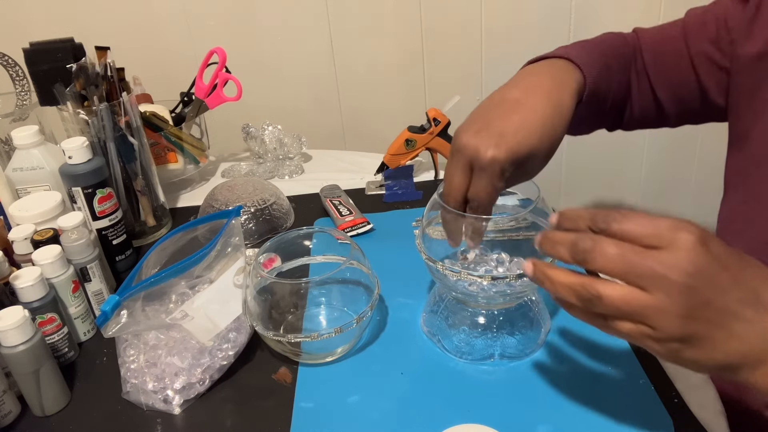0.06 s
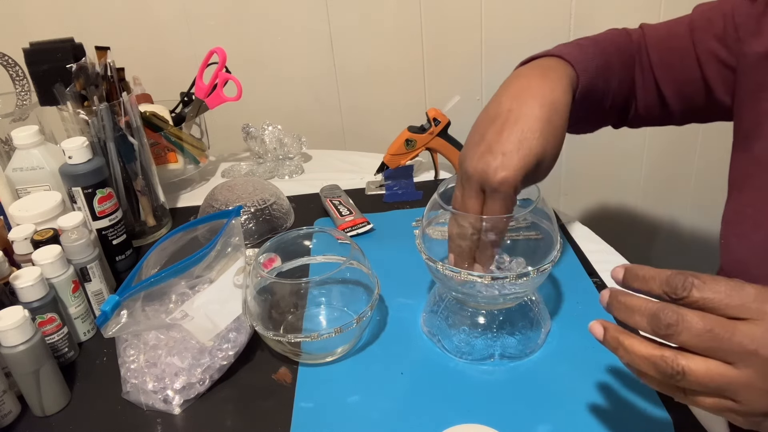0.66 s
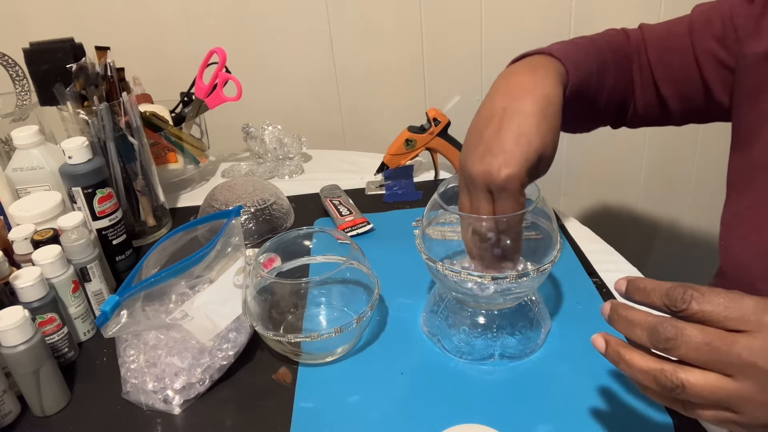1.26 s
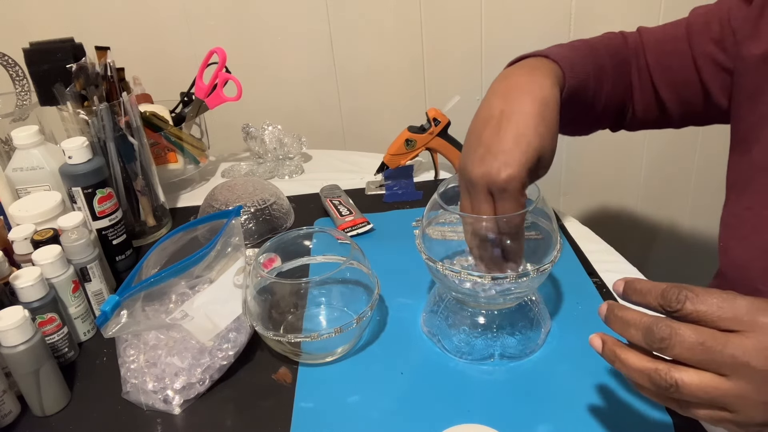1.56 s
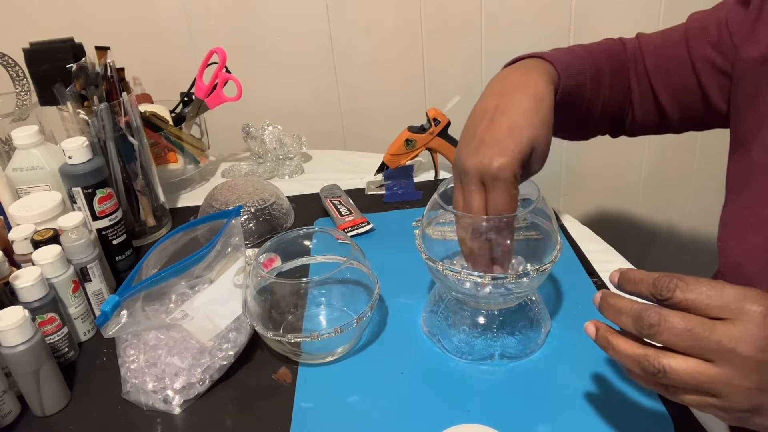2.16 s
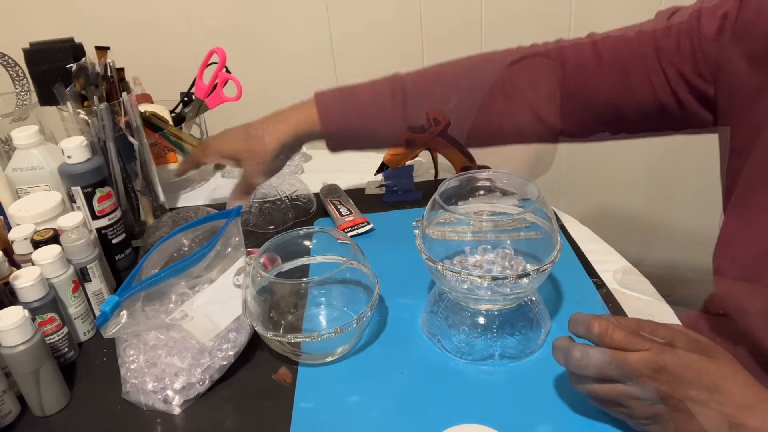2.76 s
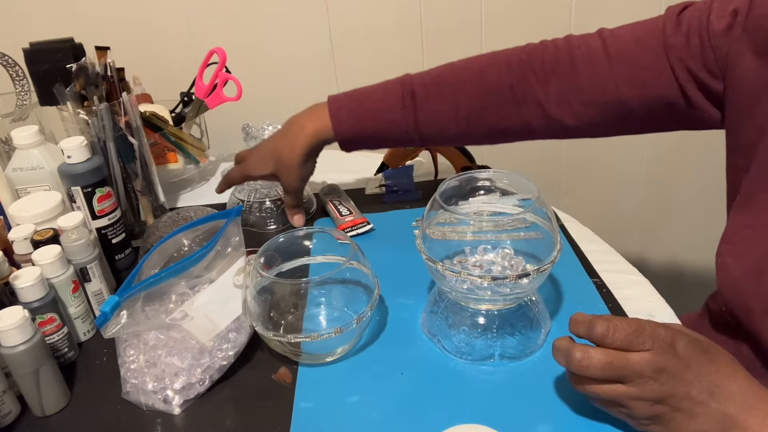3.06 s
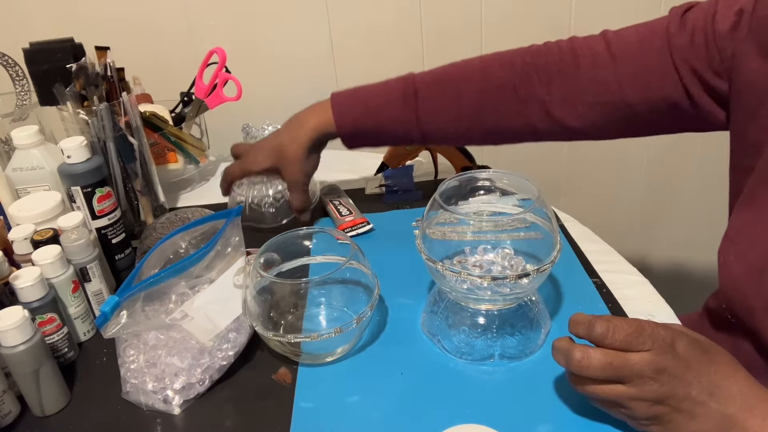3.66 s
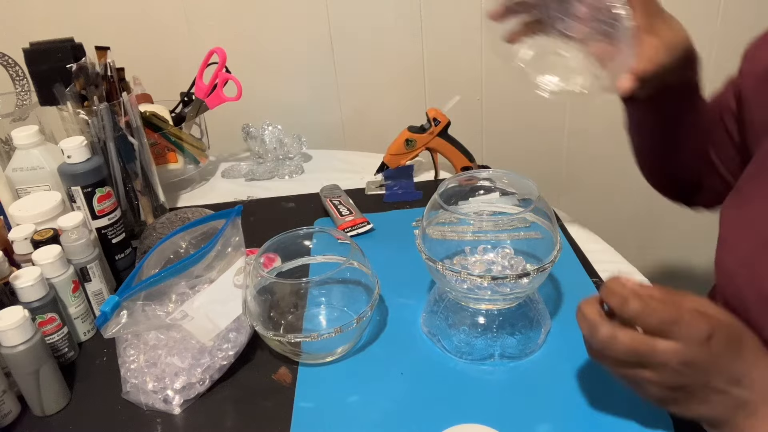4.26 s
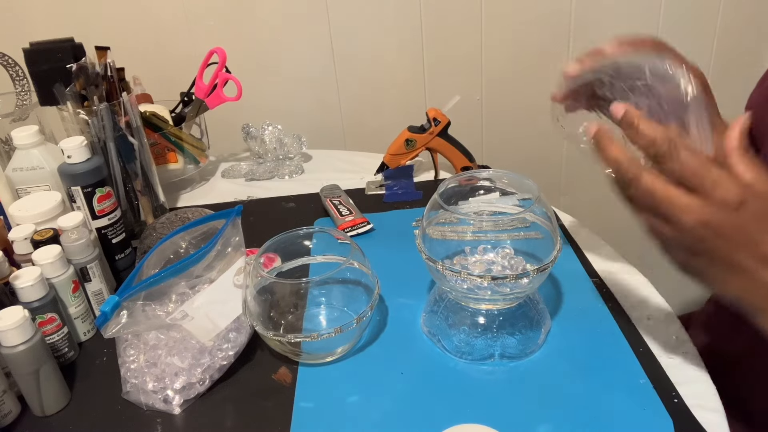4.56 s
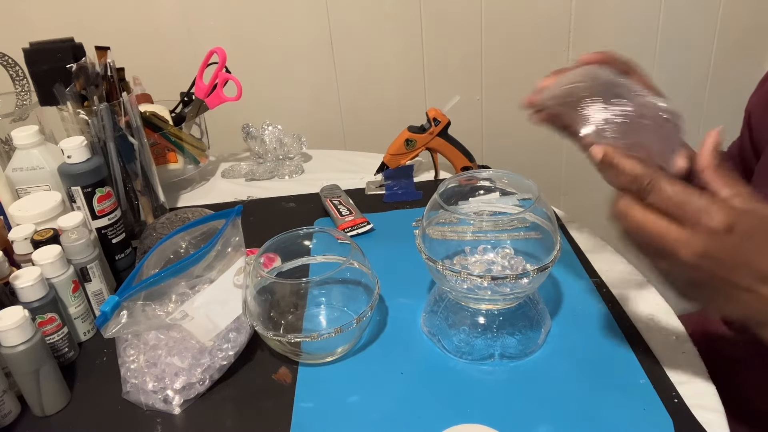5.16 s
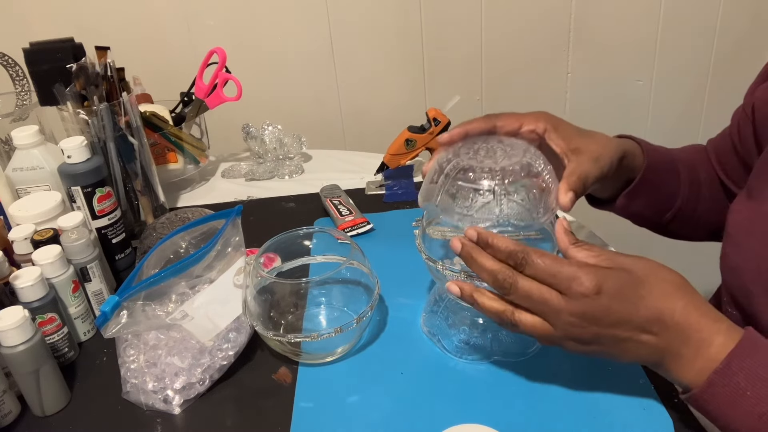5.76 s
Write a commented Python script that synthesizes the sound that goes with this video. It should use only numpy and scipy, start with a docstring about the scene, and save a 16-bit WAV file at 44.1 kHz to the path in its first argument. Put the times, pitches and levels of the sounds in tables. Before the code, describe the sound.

Plastic gems tumble into a ringing glass bowl and get nudged about; another bowl clinks, followed by light finger taps in a quiet room.

```python
"""A handful of plastic gems tumbles into a glass bowl on a craft table; fingertips nudge the pile flat.
Every contact is a bright tick that knocks the bowl and sets its rim and wall ringing. Off to the side,
a second glass bowl is picked up with a clink, its rim singing as it slides off the table, and is turned
over in the hands, which tap and rub on it. Underneath lie a dull table rumble and the air and faint
mains hum of a small room, all heard from a phone standing close by."""
import sys
import numpy as np
from scipy import signal
from scipy.fft import rfft, irfft, next_fast_len
from scipy.io import wavfile

SR = 44100
rng = np.random.default_rng(int(sys.argv[2]) if len(sys.argv) > 2 else 0)


def int16_out(signal):
    """Quantize to a 16-bit WAV file."""
    q = np.round(np.clip(np.atleast_2d(signal).T, -1, 1) * 32767)
    wavfile.write(sys.argv[1], SR, q.astype(np.int16))


N = 260835
TIME = np.arange(N) / SR

# gem hits, the tumble and then the nudges: (time [s], tick [dB], chime [dB], extra push on the bowl [dB])
GEM_HITS = [(0.1684, -30, -30.5, -5), (0.1824, -22, -40, -2), (0.1873, -33, -26.5, 0),
            (0.222, -32.5, -37.5, 0), (0.2376, -40, -58, -8), (0.253, -35.5, -52, -2),
            (0.26, -27, -50, -2.5), (0.2931, -33.5, -33, -0.5), (0.3085, -28.5, -35, -5),
            (0.3183, -33, -32.5, -9.5), (0.325, -41, -42, 1), (0.336, -33, -55, 0),
            (0.375, -30.5, -31.5, -2.5), (0.4191, -38, -40, -2.5), (0.4389, -38.5, -41.5, -7),
            (0.521, -35, -43.5, 2), (0.547, -45, -47, 1), (0.5663, -49, -66, 2), (0.8455, -66, -56.5, 5),
            (0.8615, -55, -48.5, 0), (0.868, -47, -40.5, -4), (0.874, -43, -64, -2), (0.908, -58, -71, 7),
            (0.929, -59, -52.5, 2.5), (0.9938, -50, -51.5, -1), (1.0276, -40, -43, 3.5),
            (1.0411, -42, -64, 1), (1.0756, -54, -68, 4.5), (1.0985, -48.5, -64, -0.5),
            (1.1176, -55.5, -72, -18), (1.2439, -76, -57.5, 6.5), (1.2719, -61.5, -73, -0.5),
            (1.297, -44, -43.5, -0.5), (1.6142, -47, -57.5, -13), (1.6495, -43.5, -44.5, 3.5),
            (1.6694, -47, -55, 2.5), (1.6923, -59, -73, -3), (1.879, -85, -86, 8),
            (1.935, -56.5, -62, -1.5), (2.2167, -53, -51.5, -1), (2.2357, -45, -50, -3.5),
            (2.2439, -39.5, -62, -2), (2.2595, -43, -46, -23), (2.264, -42, -52, 1),
            (2.277, -48.5, -62, 0.5), (2.2909, -45, -63, -2), (2.7112, -63, -65.5, -4.5),
            (2.801, -74, -67, -5.5)]
# bright tick of gem on gem and glass: (frequency [Hz], relative level [dB])
TICK_COLOUR = [(300, -46.5), (700, -10.5), (3800, -17.5), (5200, -15.5), (6200, -6.5), (7800, -7),
               (8500, -9), (9450, 6.5), (10200, -10.5), (11000, -12.5), (11800, -0.5), (12900, -13),
               (14200, -10), (15500, -16.5)]
# knock of the bowl, damped by pile and hand: (frequency [Hz], width [Hz], relative level [dB])
KNOCK_MODES = [(231, 120, -15.5), (528, 100, -2.5), (613, 108, 2.5), (814, 100, -1), (974, 220, -5),
               (1335, 71.7, -6), (1635, 160, 0.5), (1874, 8, -4.5), (3100, 247, -17), (3660, 97, -11),
               (4040, 390, -11), (5220, 111, -4.5)]
# clink of the rim, a close pair of modes: (frequency [Hz], width [Hz], relative level [dB])
CLINK_MODES = [(2513, 60, 0), (2570, 220, -10)]
# high chime of the wall: (frequency [Hz], width [Hz], relative level [dB])
CHIME_MODES = [(6774, 24, -14), (7003, 14, -5), (7138, 12, -1), (7200, 24, -6), (7338, 20, -10),
               (7170, 340, -7), (7828, 20, -15), (8080, 20, -14), (8420, 16, -16), (8820, 20, -15),
               (9430, 24, -13), (11762, 14, -19)]


def gems(medium_blow_db=-38.5):
    """Every contact ticks, knocks the bowl and sets its rim and wall ringing."""
    times, tick_db, chime_db, push_db = topple(GEM_HITS)
    blow_db = 10 * np.log10(from_db(tick_db) ** 2 + from_db(chime_db) ** 2) - medium_blow_db
    # the bowl's low modes swing less from blow to blow than the tick does
    knock_db = -51.5 + 0.52 * blow_db + push_db
    clink_db = -58.5 + 0.6 * blow_db + push_db
    # a falling gem lands in one clean crack; a nudged one chatters against its neighbours
    loose_db = np.minimum(0.6 * (tick_db.max() - tick_db), 10)
    cracks = [contact(chatter_s=0.003, chatter_db=db - 6, settle_s=0.02, settle_db=db - 12)
              for db in loose_db]
    # the pile passes the blow on to the glass over a few ms
    pushes = [contact(chatter_s=0.01, chatter_db=2, settle_s=0.0096, settle_db=-4) for _ in times]
    tick, count = colour(TICK_COLOUR), len(times)
    ticks = strike(times, tick_db, cracks, [gem_tick(tick) for _ in times], attack_s=0.0054, held_s=0.0045)
    knocks = strike(times, knock_db, pushes, spots(KNOCK_MODES, count), attack_s=0.0038, held_s=0.025)
    clinks = strike(times, clink_db, pushes, [body(CLINK_MODES)] * count, attack_s=0.0086, held_s=0.017)
    chimes = strike(times, chime_db, pushes, spots(CHIME_MODES, count), attack_s=0.0049, held_s=0.05)
    return ticks + knocks + clinks + chimes


def topple(hits, neighbours=2, after_s=0.022):
    """Each hit unsettles neighbours that land softly just after it; returns the columns of all contacts."""
    times, tick_db, chime_db, push_db = np.repeat(hits, neighbours, axis=0).T
    wait, luck = rng.standard_normal((len(times), 2)).T
    weaker_db = -14.5 + 2.5 * luck
    toppled = [times + after_s * np.abs(wait), tick_db + weaker_db, chime_db + weaker_db, push_db - 2]
    return np.hstack([np.transpose(hits), toppled])


def gem_tick(tick, ring_db=-2, width_hz=200, size=1024):
    """Each gem adds six short, glittering resonances of its own to the common tick."""
    modes = [(hz, width_hz, 0) for hz in rng.uniform(6000, 16000, 6)]
    ring = from_db(ring_db) * body(modes, size)
    ring[0] += 1   # lets the plain tick through
    return signal.fftconvolve(ring, tick[:size])


def spots(modes, count, spread_db=3.5):
    """One response per blow: each spot of the bowl favours other modes."""
    shapes = np.array([(-1) ** k * from_db(db) * np.sqrt(width) * body([(hz, width, 0)])
                       for k, (hz, width, db) in enumerate(modes)])
    return from_db(spread_db * rng.standard_normal((count, len(modes)))) @ shapes


# bumps of the second bowl: (time [s], strength [dB], note of the touched spot [Hz])
PICK_UP_BUMPS = [(3.153, -68, 1490), (3.282, -43.5, 3040), (3.293, -69, 4830), (3.3892, -53.5, 2200),
                 (3.4278, -51.5, 1590), (3.436, -52, 710), (3.4516, -54.5, 600), (3.462, -55, 4840)]
# its ring in the hand: (frequency [Hz], width [Hz], relative level [dB])
HELD_MODES = [(462, 120, 0), (658, 103, -1), (740, 130, -2), (1214, 56, -1.5), (1540, 120, -3),
              (2250, 175, 2), (2510, 114, -0.5), (2822, 61, 3.5), (3476, 170, -1.5), (4260, 200, -4),
              (4710, 61, 1), (6370, 1030, -8)]


def pick_up():
    """The second bowl is lifted: one hard clink among duller bumps."""
    return touch_bowl(PICK_UP_BUMPS, HELD_MODES,
                      tick_db=1.5, body_db=0.5, note_db=-3, note_width_hz=150, dulling=1.8)


# light taps on its wall: (time [s], strength [dB], note of the touched spot [Hz])
FINGER_TAPS = [(4.6055, -56.5, 4080), (4.6375, -56, 4350), (4.677, -51, 3320), (4.8046, -55, 4170),
               (4.914, -57, 3800), (5.029, -61, 1250), (5.059, -60, 4360), (5.1366, -58.5, 4500)]
# wall modes under a tapping or rubbing fingertip: (frequency [Hz], width [Hz], relative level [dB])
FINGERTIP_MODES = [(378, 50, 2), (640, 17.6, 7), (1135, 73, -1.5), (1434, 200, -3), (2590, 94, -16),
                   (3876, 160, -2.5), (4670, 170, 0)]


def finger_taps():
    """Fingers land on the glass as the bowl turns, each with a short, damped note."""
    return touch_bowl(FINGER_TAPS, FINGERTIP_MODES,
                      tick_db=-2.5, body_db=-6.5, note_db=2, note_width_hz=430, dulling=0.27)


# glassy edge of a tap on the rim: (frequency [Hz], relative level [dB])
RIM_TICK_COLOUR = [(1500, -83), (4000, -11), (6500, -2), (8000, -2.5), (8830, 5.5), (9300, 4),
                   (10800, -7.5), (11400, 1), (13000, -2.5), (15500, -30)]


def touch_bowl(touches, modes, tick_db, body_db, note_db, note_width_hz, dulling):
    """Each touch ticks, rings the held bowl and sounds its spot's note; softer ones lose their tick."""
    times, db, note_hz = np.transpose(touches)
    forces = [contact(chatter_s=0.0024, chatter_db=10, settle_s=0.0062, settle_db=3) for _ in times]
    dulled_db = db + tick_db - dulling * (db.max() - db)
    rim_ticks = [colour(RIM_TICK_COLOUR)] * len(times)
    spot_rings = [body([(hz, note_width_hz, 0)]) for hz in note_hz]
    ticks = strike(times, dulled_db, forces, rim_ticks, attack_s=0.0043, held_s=0.0043)
    knocks = strike(times, db + body_db, forces, [body(modes)] * len(times), attack_s=0.0064, held_s=0.025)
    notes = strike(times, db + note_db, forces, spot_rings, attack_s=0.0024, held_s=0.025)
    return ticks + knocks + notes


# swell and fade of the sliding rim: (time [s], level [dB])
SLIDE_ENVELOPE = [(3.28, -110), (3.3, -63), (3.335, -56.5), (3.37, -65), (3.42, -72), (3.47, -68),
                  (3.6, -105)]
# its singing modes: (frequency [Hz], width [Hz], relative level [dB])
SINGING_MODES = [(2277, 25, 0), (2340, 60, -9), (2840, 120, -12), (3375, 30, 1), (3480, 110, -8),
                 (4786, 200, -13)]


def rim_slide():
    """Grainy friction makes the second bowl's rim sing as it slides off the table."""
    return gain_curve(SLIDE_ENVELOPE) * through(grains(N, spread_db=3.7), body(SINGING_MODES))


# strokes of skin on glass: (start [s], length [s], relative level [dB])
SKIN_STROKES = [(3.261, 0.035, -62.5), (3.421, 0.038, -67.5), (4.211, 0.02, -71.5), (4.287, 0.15, -77.5),
                (4.606, 0.12, -75), (4.759, 0.18, -65), (4.994, .14, -65.5), (5.036, 0.021, -64.5),
                (5.187, .025, -69.5)]
# hiss of the rubbing skin: (frequency [Hz], relative level [dB])
SKIN_COLOUR = [(200, -18), (640, -22), (950, -12.5), (1300, -16), (2000, -20.5), (2500, -12), (2850, -19),
               (3300, -18), (4500, -13), (5700, -8.5), (8500, -11.5), (12000, -14.5), (15500, -22)]


def rubbing(slips_per_s=120, grips_per_s=45, grip_db=2, attack_s=0.026, release_s=0.014):
    """Skin on glass grips and lets go: an uneven hiss with tiny separate slips that ring the wall."""
    slip_here = rng.random(N) < slips_per_s / SR
    slips = unit_energy(slip_here * rng.standard_normal(N)) * np.sqrt(N)
    grip = np.interp(TIME * grips_per_s, np.arange(N), rng.standard_normal(N))
    pressure = np.zeros(N)
    for start, length, db in SKIN_STROKES:
        swell = np.exp(np.minimum(TIME - start, 0) / attack_s)
        release = np.exp(-np.maximum(TIME - start - length, 0) / release_s)
        pressure += from_db(db) * swell * release
    friction = (rng.standard_normal(N) + slips) * pressure * from_db(grip_db * grip)
    hiss = from_db(-5.5) * through(friction, colour(SKIN_COLOUR))
    ring = from_db(-6.5) * through(friction, body(FINGERTIP_MODES))
    return hiss + ring


def contact(chatter_s, chatter_db, settle_s, settle_db, size=4096):
    """Force of one contact: a click, a few ms of chatter, then a sparser crackle of settling."""
    t = TIME[:size]
    force = from_db(chatter_db) * unit_energy(grains(size, spread_db=5.1) * np.exp(-t / chatter_s))
    force += from_db(settle_db) * unit_energy(grains(size, spread_db=12) * np.exp(-t / settle_s))
    force[0] += 1
    return force


def grains(size, spread_db):
    """Random micro-impacts of very uneven strength, rms 1."""
    impacts = rng.standard_normal(size) * from_db(spread_db * np.clip(rng.standard_normal(size), -2, 2))
    return unit_energy(impacts) * np.sqrt(size)


def strike(times, levels_db, forces, responses, attack_s, held_s):
    """Each force rings its response; the level is the energy of the first held_s spread over attack_s."""
    out = np.zeros(N)
    for time, db, force, response in zip(times, levels_db, forces, responses):
        hit = signal.fftconvolve(force, response)
        early_energy = np.sum(hit[:int(held_s * SR)] ** 2)
        hit *= from_db(db) * np.sqrt(attack_s * SR / early_energy)
        start = int(time * SR)
        out[start:start + len(hit)] += hit[:N - start]
    return out


def body(modes, size=6000):
    """Ring of a struck object: decaying sines, the narrower the longer."""
    t = TIME[:size]
    ring = np.zeros(size)
    for k, (hz, width, db) in enumerate(modes):
        envelope = from_db(db) * width * np.exp(-np.pi * width * t)
        ring += (-1) ** k * envelope * np.sin(2 * np.pi * hz * t)
    return unit_energy(ring)


def colour(points, size=8192):
    """An EQ curve as a causal (minimum-phase) impulse response."""
    hz, db = np.transpose(points)
    grid_hz = np.maximum(np.arange(size // 2 + 1) * SR / size, 1)
    gain = from_db(np.interp(np.log(grid_hz), np.log(hz), db))
    cepstrum = irfft(np.log(gain))
    cepstrum[1:size // 2] *= 2
    cepstrum[size // 2 + 1:] = 0
    return unit_energy(irfft(np.exp(rfft(cepstrum))))


def through(x, response):
    """A signal passed through an impulse response."""
    return signal.oaconvolve(x, response)[:N]


def gain_curve(rows):
    """A (time [s], level [dB]) envelope as a gain at every sample."""
    return from_db(np.interp(TIME, *np.transpose(rows)))


def from_db(db):
    """Decibels to gain."""
    return 10 ** (np.asarray(db) / 20)


def unit_energy(x):
    """Scaled so that its squares sum to one."""
    return x / np.sqrt(np.sum(x ** 2) + 1e-20)


# the small room's reverb bands: (low edge [Hz], high edge [Hz], t60 [s], relative level [dB])
REVERB_BANDS = [(203, 920, 0.53, 1.5), (1110, 4930, 0.3, 0.5), (3616, 8740, 0.19, -7),
                (8300, 17000, 0.41, -13)]


def room_tail(build_s=0.0015, size=24000):
    """Dense reflections that build up quickly and linger longest in the lows."""
    t, tail = TIME[:size], 0
    for low, high, t60, db in REVERB_BANDS:
        envelope = from_db(-60 * t / t60) * (1 - np.exp(-t / build_s))
        reflections = unit_energy(rng.standard_normal(size) * envelope)
        band = signal.butter(2, [low, high], "band", fs=SR, output="sos")
        tail = tail + from_db(db) * signal.sosfilt(band, reflections)
    return tail


def in_room(dry, wet_db, side_db, left_late_s=0):
    """Direct sound, which may reach the left channel later, plus the room's answer in each channel."""
    direct = np.array([np.roll(dry, round(left_late_s * SR)), dry])
    reverb = np.array([through(dry, tail) for tail in diffuse(room_tail, side_db)])
    return direct + from_db(wet_db) * reverb


def diffuse(make, side_db):
    """A wide stereo field: one part common to both channels and one opposed."""
    side = from_db(side_db)
    return (make() + side * make() * np.array([[1], [-1]])) / np.sqrt(1 + side ** 2)


# rise and fall of the table's rumble: (time [s], relative level [dB])
RUMBLE_ENVELOPE = [(0, -50), (.14, -51.5), (.22, -58.5), (.45, -56.5), (1.25, -57.5), (2.05, -61),
                   (2.15, -72), (3.3, -62), (5.9, -66)]
# its bass-heavy tone: (frequency [Hz], relative level [dB])
TABLE_COLOUR = [(15, -21), (30, -12), (45, -1), (62, 5.5), (85, -10.5), (130, -10.5), (250, -18),
                (600, -56.5)]


def table_rumble(trim_db=-1):
    """The table rumbles dully under the moving arms."""
    rumble = diffuse(lambda: through(rng.standard_normal(N), colour(TABLE_COLOUR)), side_db=-14)
    return from_db(trim_db) * gain_curve(RUMBLE_ENVELOPE) * rumble


# dark room tone: (frequency [Hz], relative level [dB])
AIR_COLOUR = [(20, -16.5), (42, -0.5), (70, -4), (95, -14.5), (170, -9.5), (280, -14), (400, -11),
              (800, -25), (1500, -27.5), (2500, -38.5), (5000, -42), (10000, -40.5), (15500, -43.5)]


def room_air(level_db=-65):
    """The room's air is a steady bed of soft, low noise."""
    air = diffuse(lambda: through(rng.standard_normal(N), colour(AIR_COLOUR)), side_db=-9)
    return from_db(level_db) * air


# partials of the mains hum: (frequency [Hz], level [dB])
HUM_PARTIALS = [(59.5, -71), (120, -76)]


def mains_hum():
    """The mains hums faintly on two steady sines about an octave apart."""
    return sum(np.sqrt(2) * from_db(db) * np.sin(2 * np.pi * (hz * TIME + rng.random()))
               for hz, db in HUM_PARTIALS)


def scene():
    """The gems lie straight ahead; the second bowl is handled off to the side."""
    second_bowl = pick_up() + finger_taps() + rim_slide() + rubbing()
    handling = in_room(second_bowl, wet_db=2.5, side_db=1.5, left_late_s=0.00023)
    tumble = in_room(gems(), wet_db=0.5, side_db=-1.5)
    return tumble + handling + room_air() + table_rumble() + mains_hum()


def record(dry, lean_left_db=2, treble_from_hz=6120, treble_lag_samples=11, cutoff_hz=16050):
    """The phone is stereo in the lows; its treble is one signal that reaches the left a little late."""
    size = next_fast_len(N + 2048)
    hz = np.arange(size // 2 + 1) * SR / size
    left, right = rfft(dry, size)
    stereo_share = 1 / (1 + (hz / treble_from_hz) ** 20)
    late = right * np.exp(-2j * np.pi * hz * treble_lag_samples / SR)
    left = np.sqrt(stereo_share) * from_db(lean_left_db / 2) * left + np.sqrt(1 - stereo_share) * late
    right = right * from_db(-lean_left_db / 2 * stereo_share)
    low_pass = 1 / np.sqrt(1 + (hz / cutoff_hz) ** 160)
    return irfft(np.array([left, right]) * low_pass, size)[:, :N]


dry = scene()
out = record(dry)
int16_out(out)
```